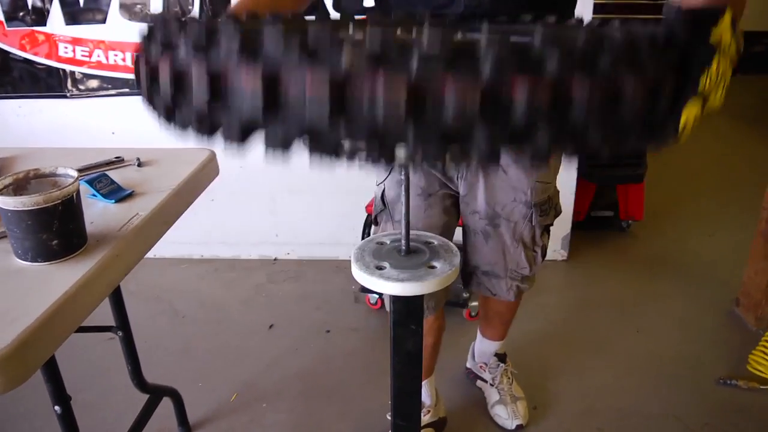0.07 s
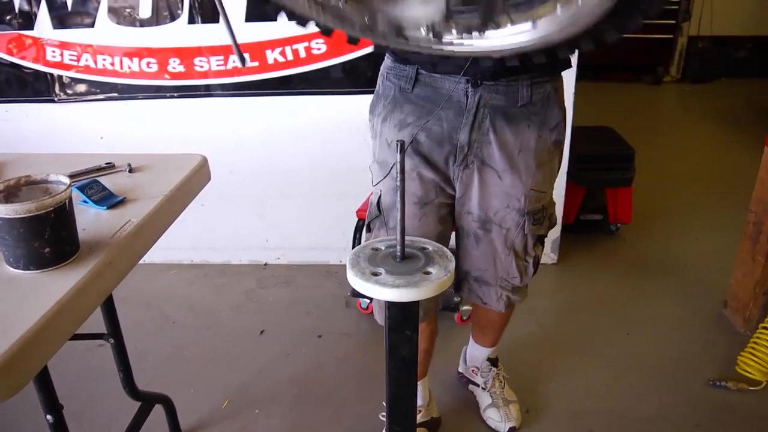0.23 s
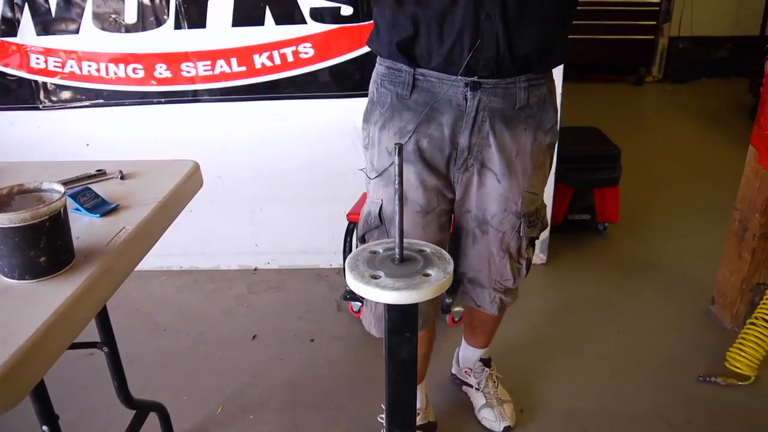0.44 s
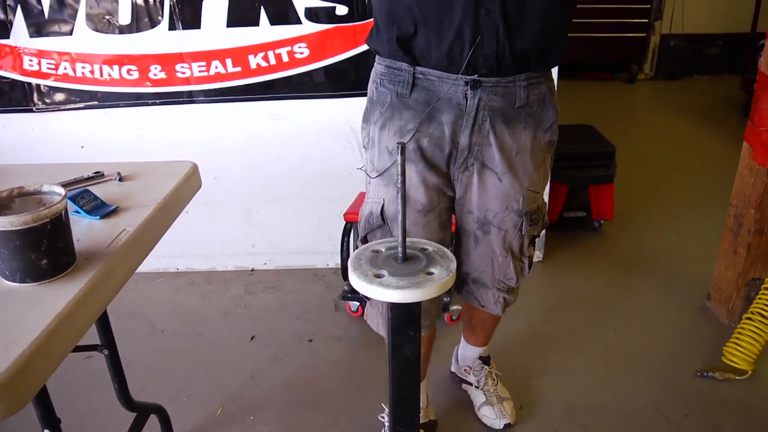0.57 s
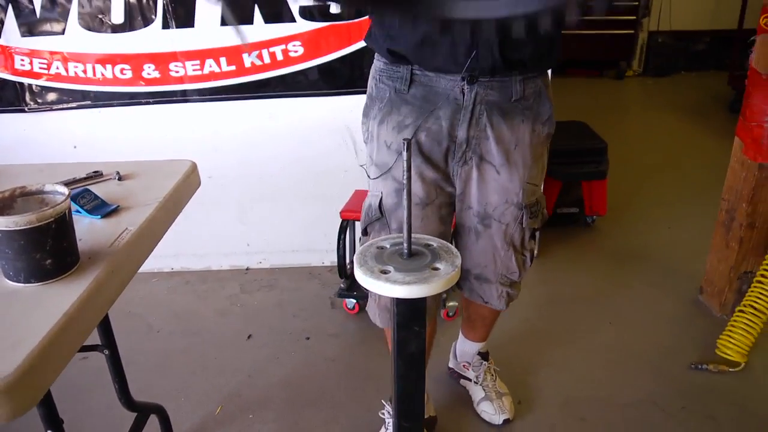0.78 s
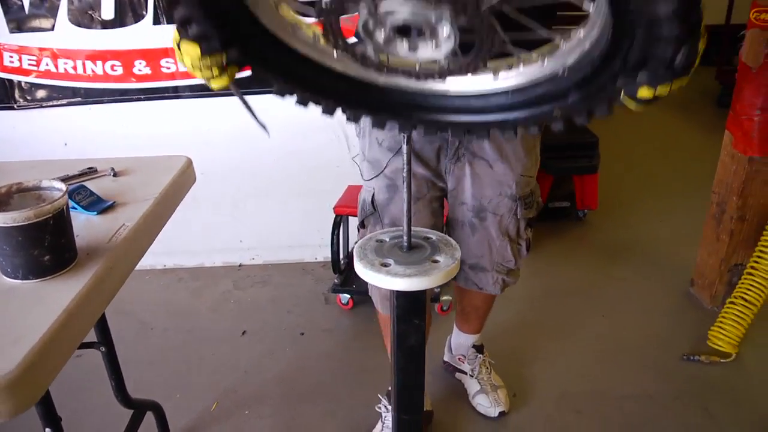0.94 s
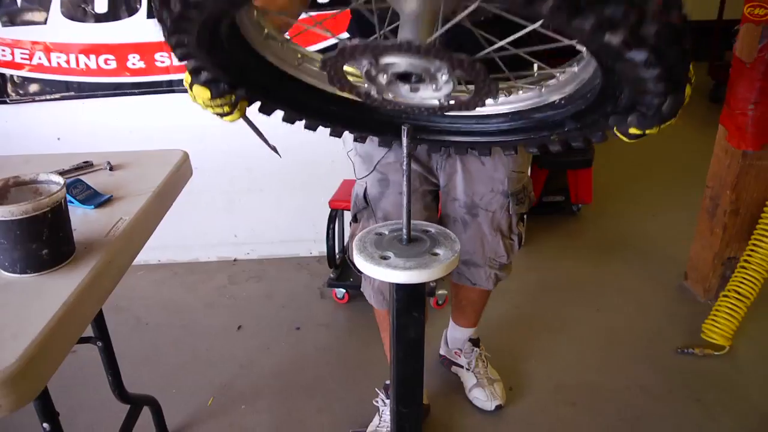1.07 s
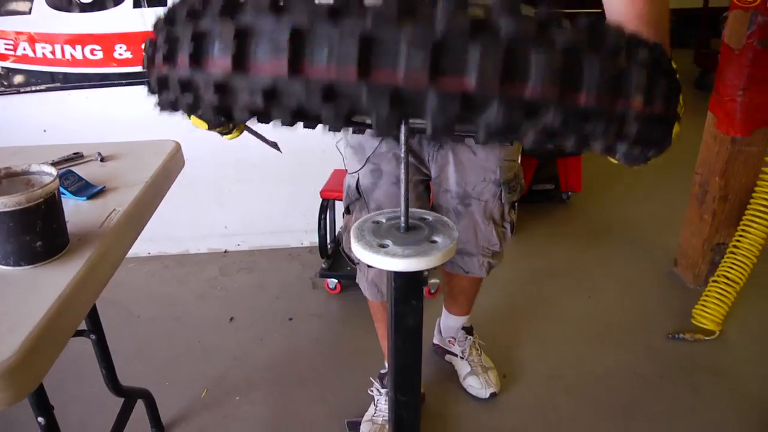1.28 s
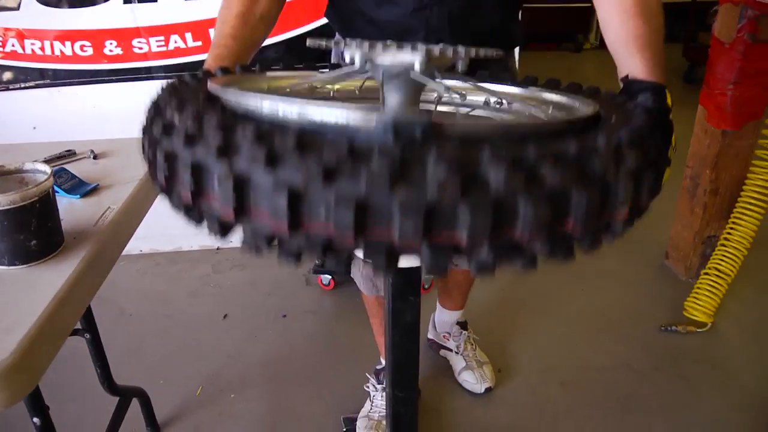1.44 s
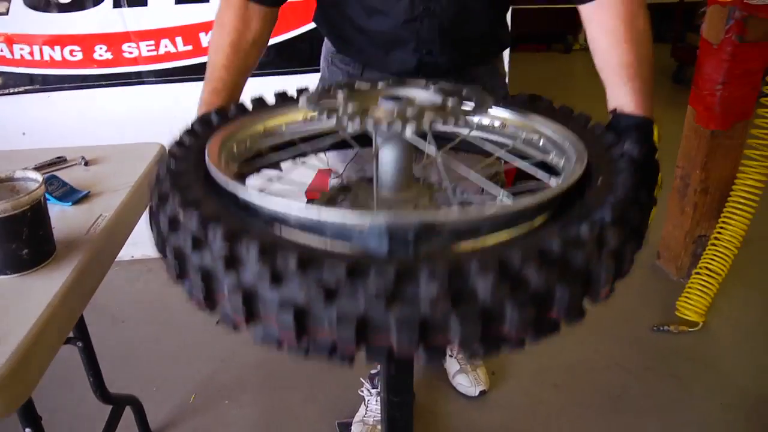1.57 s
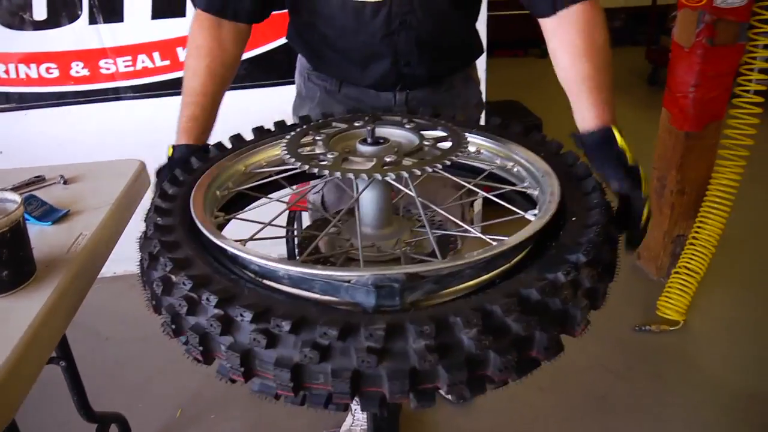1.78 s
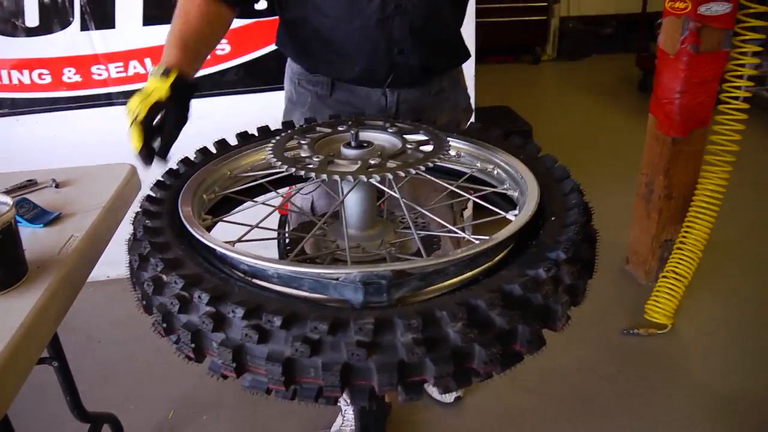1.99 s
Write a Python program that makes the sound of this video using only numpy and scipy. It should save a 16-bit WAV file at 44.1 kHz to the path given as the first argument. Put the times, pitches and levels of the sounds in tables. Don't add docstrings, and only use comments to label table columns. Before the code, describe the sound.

A spoked wheel's metal hub scrapes and clanks off a steel rod, leaving a ring; soft glove rustles and low air puffs follow, then a quick scrape and a heavy ringing thud, close in a quiet workshop.

```python
import sys
import numpy as np
from scipy import signal
from scipy.fft import rfft, irfft, next_fast_len
from scipy.io import wavfile

SR = 44100
rng = np.random.default_rng(int(sys.argv[2]) if len(sys.argv) > 2 else 0)


def wrap_up_sound(samples):
    columns = np.atleast_2d(samples).T
    tamed = np.clip(columns, -1, 1)
    steps = np.round(tamed * 32767).astype(np.int16)
    wavfile.write(sys.argv[1], SR, steps)


def makeup_ratio(level_db):
    decades = np.asarray(level_db, float) / 20
    return 10 ** decades


N = 89037
T = np.arange(N) / SR


def rms(x):
    return np.sqrt(np.mean(x ** 2))


def rms_one(x):
    return x / np.sqrt(np.mean(x ** 2) + 1e-20)


def curve(rows):
    s, db = np.transpose(rows)
    return makeup_ratio(np.interp(T, s, db, left=-150, right=-150))


def click(s, db):
    x = np.zeros(N)
    x[int(s * SR)] = makeup_ratio(db)
    return x


def ring(x, hz, t60):
    r, w = makeup_ratio(-60 / (t60 * SR)), 2 * np.pi * hz / SR
    return signal.lfilter([0, np.sin(w)], [1, -2 * r * np.cos(w), r * r], x + 1e-18)


def band(x, low_hz, high_hz):
    limits = [max(low_hz, 10), min(high_hz, .45 * SR)]
    return signal.sosfilt(signal.butter(2, limits, "band", fs=SR, output="sos"), x)


def colour(x, points):
    hz, db = np.transpose(points)
    edges = 28.3 * 2 ** np.arange(0, 9.6, .5)
    out = 0
    for k, (low, high) in enumerate(zip(edges, edges[1:])):
        gain = makeup_ratio(np.interp(np.log(low * high) / 2, np.log(hz), db, left=-70))
        out = out + (-1) ** k * gain * band(x, low, high)
    return out


def grains(per_s, spread_db):
    size = makeup_ratio(spread_db * np.minimum(rng.exponential(1, N), 4)) * rng.choice([-1, 1], N)
    return rms_one(size * (rng.random(N) < per_s / SR))


def patches(db):
    return makeup_ratio(db * np.interp(T * 45, np.arange(400), rng.standard_normal(400)))


def spokes(force, rough):
    t60_s, level_db = 0.074, 2.0
    burst = rough[:SR // 10] * makeup_ratio(-60 * np.arange(SR // 10) / SR / t60_s)
    return force + makeup_ratio(level_db) * signal.fftconvolve(force, burst / np.sqrt(np.sum(burst ** 2)))[:N]


# pitch in Hz, width in Hz,
# then level in dB in the drag, the lift-off, the slide-on and the landing.
BODY_MODES = [(630, 120, 4.5, -32, -22, 15), (910, 200, -14.5, -1, -6.5, -28),
              (1313, 154, -20, -36, -1.5, -21), (1655, 67, 4, 1, 3.5, 5.5), (2054, 94, 0, -4.5, 0, 0),
              (2690, 20, 4, -24, 3.5, -38), (3735, 79, -9, -2, -8, -1), (4080, 210, -28, -1.5, -18, -3),
              (5346, 69, -6, -5, -13, -29), (8020, 64, -32, -2, -46, -50), (12160, 1400, -7, -2.5, -30, -9)]


def scrape(k, pressure, grit_colour, body_db, grit_db):
    rough = grains(3500, 0.5)
    force = rough * pressure
    body = 0
    for j, (hz, width_hz, *db) in enumerate(BODY_MODES):
        t60_s = np.log(1000) / np.pi / width_hz
        mode = ring(force * patches(4.5), hz, t60_s)
        body = body + (-1) ** j * makeup_ratio(db[k]) * np.sqrt(width_hz) * mode
    grit = colour(spokes(force, rough), grit_colour)
    return (makeup_ratio(body_db) * rms_one(body) + makeup_ratio(grit_db) * rms_one(grit)) * rms(pressure)


LONG_MODE_HZ = [140, 648, 797, 873, 1013, 1342, 1551, 1853, 2026, 2530, 2612, 3908, 4484, 5720]
# t60 in seconds,
# then level in dB after the drag, the lift-off, the slide-on and the landing.
LONG_MODES = [(0.7, -51, -60, -69, -29), (0.71, -36, -44.5, -41, -52), (0.34, -29.5, -23.5, -40, -49),
              (1.01, -52, -32, -65, -61), (0.71, -25.5, -36, -30, -35.5), (0.71, -45, -70, -28, -25.5),
              (0.91, -48, -72, -38, -42), (1.04, -33.5, -42.5, -26, -40.5), (0.43, -21, -46, -18.5, -31.5),
              (1.28, -45, -58, -41.5, -46.5), (0.7, -32.5, -34, -40, -47), (0.47, -47, -46, -47, -43),
              (0.58, -39, -34, -53, -60), (0.5, -42.5, -33.5, -54, -76)]


def ringing(k, struck_s, rise_s, damped_s):
    twin_hz, twin_share, damped_t60_s = 4.06, 0.37, 0.35
    since = np.maximum(T - struck_s, 0)
    out = 0
    for hz, (t60_s, *db) in zip(LONG_MODE_HZ, LONG_MODES):
        near_hz = hz + twin_hz * rng.uniform(0.455, 1.502)
        tone = np.sin(2 * np.pi * (hz * T + rng.random()))
        twin = np.sin(2 * np.pi * (near_hz * T + rng.random()))
        out = out + makeup_ratio(db[k] - 60 * since / t60_s) * (tone + twin_share * twin)
    damping = makeup_ratio(-60 * np.maximum(T - damped_s, 0) / damped_t60_s)
    return out * (1 - np.exp(-since / rise_s)) * damping


# time in seconds, level in dB.
DRAG = [
    (0, -41),
    (.03, -50),
    (.038, -35),
    (.044, -46),
    (.05, -35.5),
    (.062, -51),
    (.085, -57),
    (.12, -62),
]
LIFT_OFF = [
    (0.146, -51),
    (0.152, -32.5),
    (.168, -32.5),
    (0.175, -25.5),
    (0.199, -27.5),
    (0.211, -36),
    (.24, -44),
    (.3, -58.5),
]
SLIDE_ON = [
    (1.513, -40),
    (1.52, -31.5),
    (1.538, -35),
    (1.553, -31),
    (1.569, -48),
    (1.63, -66),
]
LANDING = [
    (1.7606, -30),
    (1.776, -30),
    (1.801, -37),
    (1.837, -48.5),
    (1.837, -38),
    (1.853, -47.5),
    (1.885, -58),
    (1.929, -67),
]
# pitch in Hz, level in dB per Hz.
DRAG_GRIT = [(150, -24), (600, -13), (2000, -5), (4000, -17), (16000, -36)]
LIFT_GRIT = [(70, 0), (900, -18), (2000, 0), (6000, -12), (16000, -28)]
SLIDE_GRIT = [(400, -51), (1000, -0.5), (2200, -3.5), (4000, -20.5), (16000, -27.5)]
LAND_GRIT = [(50, 9), (400, -1), (2000, -4.5), (5000, -21), (16000, -41.5)]
# struck at in seconds, rise
# in seconds, damped by the next contact at in seconds (3: rings on to the end).
CONTACT_MIX = [
    (5.5, 9.5, -.02, 0.026, 0.18),
    (5, 4.5, 0.163, 0.041, 3),
    (8.5, 7, 1.515, 0.005, 1.765),
    (5.5, 11, 1.775, 0.015, 3),
]


def contacts():
    pressures = DRAG, LIFT_OFF, SLIDE_ON, LANDING
    grits = DRAG_GRIT, LIFT_GRIT, SLIDE_GRIT, LAND_GRIT
    scrapes, rings = 0, 0
    for k, (body_db, grit_db, struck_s, rise_s, damped_s) in enumerate(CONTACT_MIX):
        scrapes = scrapes + scrape(k, curve(pressures[k]), grits[k], body_db, grit_db)
        rings = rings + ringing(k, struck_s, rise_s, damped_s)
    return scrapes, rings


THUD_S = [
    1.7622,
    1.835,
    .037,
    .048,
    .734,
]
# peak in dB, pitch in Hz, t60 in seconds.
THUDS = [(0.5, 320, 0.025), (-10.5, 310, 0.013), (-23.5, 426, 0.038), (-23.5, 380, 0.038),
         (-27, 341, 0.061)]


def thuds():
    out = 0
    for s, (db, hz, t60_s) in zip(THUD_S, THUDS):
        out = out - band(ring(click(s, db), hz, t60_s), hz / 2, hz * 2)
    return out


PING_S = [1.035, 1.99, 1.76, 1.761, .172, .168, 1.549, 1.52, 1.517, 1.523, 1.885, 1.847, 1.912, 1.802,
          1.838, 1.77, 1.762, .152, .151, .17, .18, .196, .232, .186, .017, .02, .045, .034, 1.535, 1.556,
          1.518, 1.526, 1.78, 1.846, .79, .818, .784, .656, .699, .74]
# pitch in Hz, level in dB, t60 in seconds.
PINGS = [(9900, -62, 0.11), (3570, -49, 0.031), (1870, -13, 0.011), (3705, -21, 0.034), (2024, -19, 0.091),
         (1678, -17.5, 0.12), (1600, -18.5, 0.11), (6020, -34, 0.074), (2640, -20.5, 0.077),
         (4020, -30.5, 0.17), (469, -38.5, 0.46), (647.6, -23, .2), (625, -30, 0.24), (2060, -19, 0.053),
         (2113, -28, 0.094), (2005, -21.5, 0.042), (1021, -20.5, 0.2), (5240, -31.5, 0.088),
         (1270, -24.5, 0.072), (3640, -24, .08), (4710, -23.5, .06), (5400, -27, 0.046), (4400, -29, 0.11),
         (5740, -23, 0.11), (2690, -25, 0.075), (5280, -42, .08), (5350, -39, 0.18), (1850, -27, .05),
         (5260, -36, .1), (2700, -28, 0.18), (3425, -35, 0.18), (4320, -38, 0.19), (5260, -29, 0.04),
         (11900, -44.5, 0.078), (4040, -40.5, 0.023), (1780, -40, .04), (712, -42, 0.033),
         (970, -39.5, .03), (1920, -48, 0.022), (1050, -43, 0.024)]


def pings():
    return sum(ring(click(s, db), hz, t60_s) for s, (hz, db, t60_s) in zip(PING_S, PINGS))


# start in seconds, length in seconds, from
# Hz, to Hz, peak in dB.
SQUEAKS = [
    (.169, 0.013, 2240, 1850, -15.5),
    (.184, 0.028, 3630, 4400, -28.5),
    (.186, .024, 2495, 2930, -27.5),
    (1.635, .13, 4440, 4470, -54),
]


def squeaks():
    out = 0
    for s, length, from_hz, to_hz, db in SQUEAKS:
        part = np.clip((T - s) / length, 0, 1)
        cycles = length * part * (from_hz + (to_hz - from_hz) * part / 2)
        out = out + makeup_ratio(db) * np.sin(np.pi * part) * np.sin(2 * np.pi * cycles)
    return out


TURNING_HZ = [1342, 2530]
TURNING_S = [.19, .23, .34, .42, .48, .53, .6, .66, .72, .85, .92, 1.02, 1.12, 1.3, 1.5]
TURNING_DB = [
    [-52, -46, -53.5, -46.5, -51.5, -65, -59.5, -60, -78, -70, -59.5, -58, -61, -65.5, -69],
    [-45, -48, -51, -48.5, -61, -75, -55.5, -62, -67, -65, -66, -61, -71, -73, -73],
]


def turning_rim():
    out = 0
    for hz, levels in zip(TURNING_HZ, TURNING_DB):
        gain = np.sqrt(2) * curve(np.transpose([TURNING_S, levels]))
        out = out + gain * np.sin(2 * np.pi * hz * T)
    return out


# start in seconds, length in seconds, level in dB, centre in Hz, width in octaves.
RUSTLES = [(0.39, 0.34, -62.5, 11000, 1.8), (0.67, 0.09, -59, 13000, 1.2), (0.781, 0.054, -51.5, 9800, 1.3),
           (0.781, 0.034, -39, 1850, 0.49), (0.94, 0.13, -47.5, 2000, 0.51),
           (0.97, 0.018, -58.5, 10700, 0.53), (1.035, 0.038, -53, 2400, 1.4),
           (1.578, 0.059, -52.5, 11500, 0.54), (1.843, 0.042, -56, 10400, 0.65),
           (0.78, 0.038, -41.5, 530, 1.45), (0.62, 0.038, -52, 680, 2.15), (0.697, 0.023, -50.5, 600, 2.9),
           (.81, 0.031, -51, 1680, 0.9), (1.758, .04, -39.5, 12300, 0.53), (0.731, .02, -48, 600, 1.7)]


def rustles():
    out = 0
    for s, length, db, hz, octaves in RUSTLES:
        shape = np.clip(np.minimum((T - s) / 0.0065, (s + length - T) / (0.44 * length)), 0, 1)
        rub = shape * grains(770 * (1 + hz / 2000), 3.1) * patches(3.5)
        low, high = hz / 2 ** (octaves / 2), hz * 2 ** (octaves / 2)
        rub = band(band(rub, low, high), low / 3.3, high * 6.0)
        out = out + makeup_ratio(db) * rms_one(rub) * rms(shape)
    return out


# time in seconds, peak in dB, centre in Hz.
TICKS = [(0.597, -39.5, 6100), (.943, -27.5, 6800), (.961, -34, 2180), (.985, -40, 3020),
         (1.026, -34.5, 11800), (1.239, -40, 12400), (0.806, -34, 1500), (1.011, -38, 2000),
         (1.026, -31.5, 2000), (1.072, -43, 2200)]


def ticks():
    out = 0
    for s, db, hz in TICKS:
        tick = band(band(click(s, 0), hz / 2, hz * 2), hz / 2, hz * 2)
        out = out + makeup_ratio(db) * tick / np.abs(tick).max()
    return out


PUFF_S = [.18, .284, .301, .385, .418, .491, .748, 1.183, 1.208, 1.268, .704, .384, 1.325, 1.37, .87, 1.155,
          1.86]
# peak in dB, pitch in Hz.
PUFFS = [(-14, 177), (-14, 99), (-10, 178), (-17.5, 69), (-19, 85), (-23, 86), (-19, 134), (-25.5, 95),
         (-27, 89), (-29.5, 76), (-26.5, 185), (-24.5, 190), (-32, 75), (-35.5, 61), (-33, 130), (-34, 92),
         (-23, 203)]
# time in seconds, level in dB.
BUFFET = [
    (.2, -35),
    (.23, -78),
    (.28, -39),
    (.42, -32.5),
    (.62, -49.5),
    (1.12, -66),
    (1.2, -46.5),
    (1.45, -68),
]


def air():
    out = curve(BUFFET) * rms_one(band(band(rng.standard_normal(N), 45, 139), 37, 394))
    for s, (db, hz) in zip(PUFF_S, PUFFS):
        out = out + band(ring(click(s, db), hz, 2.75 / hz), hz * 0.61, hz * 2.1)
    return out


def shop(x):
    t60_s, wall_cut_hz = 0.48, 18600
    size = next_fast_len(N + SR)
    w = 2 * np.pi * np.arange(size // 2 + 1) / size
    dull = 1 / (1 + 1j * w * SR / (2 * np.pi * wall_cut_hz)) ** 0.62
    echoes = 0
    for k, lag_s in enumerate(rng.uniform(.011, .045, 12)):
        one_round = makeup_ratio(-60 * lag_s / t60_s) * dull * np.exp(-1j * w * lag_s * SR)
        echoes = echoes + (-1) ** k * one_round / (1 - one_round)
    return irfft(rfft(x, size) * echoes, size)[:N]


# pitch in Hz, level in dB per Hz.
HISS = [(30, 0.5), (70, 3.5), (250, -2.5), (1250, -9), (1700, -16.5), (3000, -18.5), (7000, -28.5),
        (16000, -26)]
# pitch in Hz, level in dB.
FAINT_TONES = [
    (120, -55),
    (912, -60),
]


def background():
    out = makeup_ratio(-55) * rms_one(colour(rng.standard_normal(N), HISS))
    for hz, db in FAINT_TONES:
        waver = np.interp(T, np.arange(0, 2.2, .12), rng.standard_normal(19))
        out = out + makeup_ratio(db - 2.5 + 0.83 * waver) * np.sin(2 * np.pi * hz * T)
    return out


def scene():
    scrapes, rings = contacts()
    knocks = scrapes + thuds() + pings() + squeaks() + turning_rim() + rustles() + ticks()
    return (knocks + makeup_ratio(-24.5) * shop(knocks) + rings + air() + background())[None]


def roll_off(x):
    return signal.sosfilt(signal.butter(12, 16830, fs=SR, output="sos"), x)


def record(dry):
    rounded = .75 * np.tanh(dry / 0.77)
    finished = signal.sosfilt(signal.cheby2(10, 50, 17000, fs=SR, output="sos"), rounded)
    return roll_off(finished)


dry = scene()
out = record(dry)
wrap_up_sound(out)
```